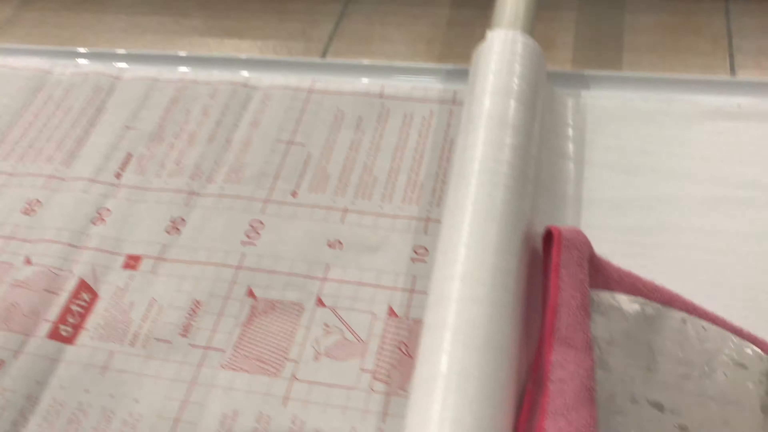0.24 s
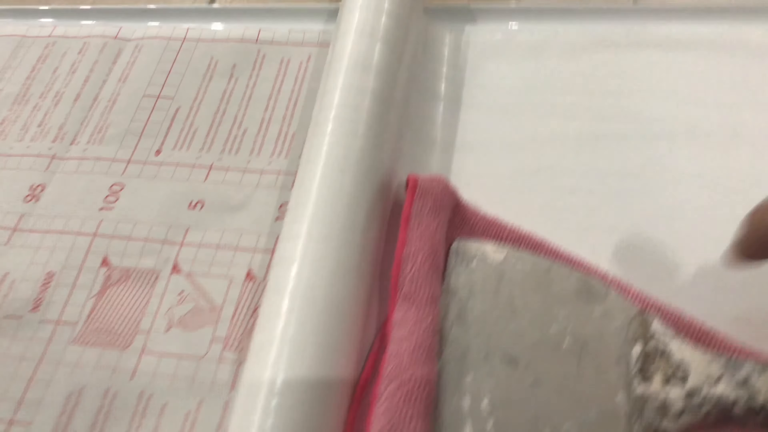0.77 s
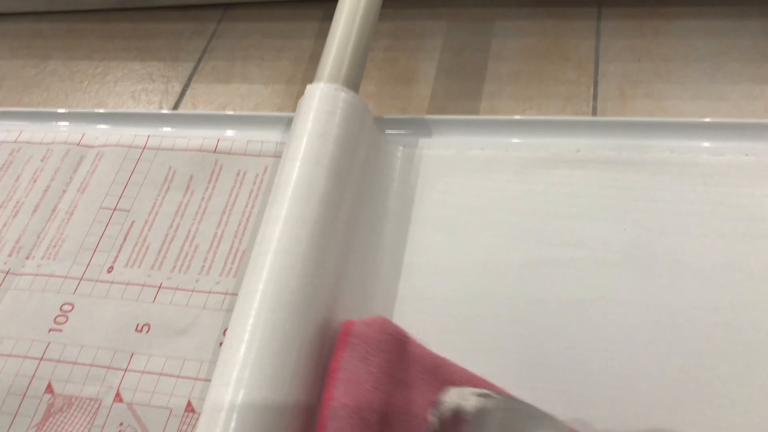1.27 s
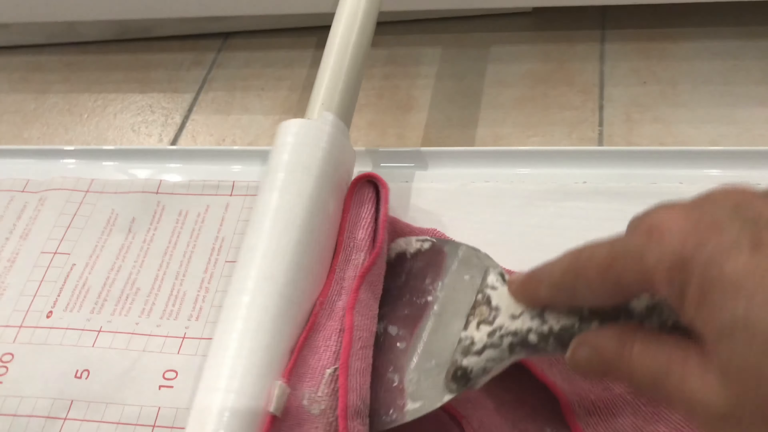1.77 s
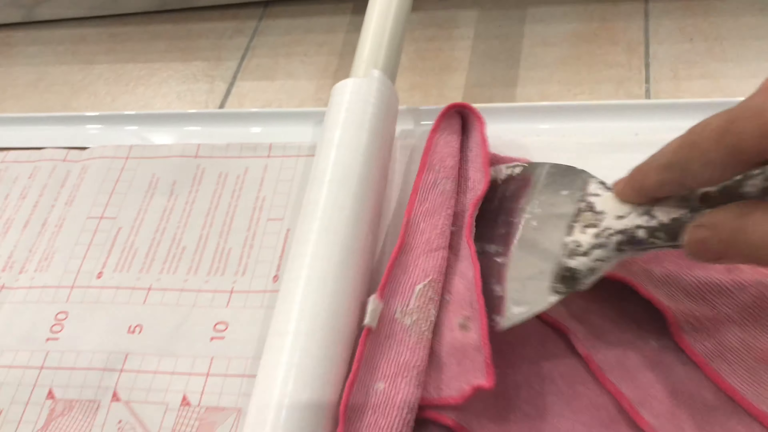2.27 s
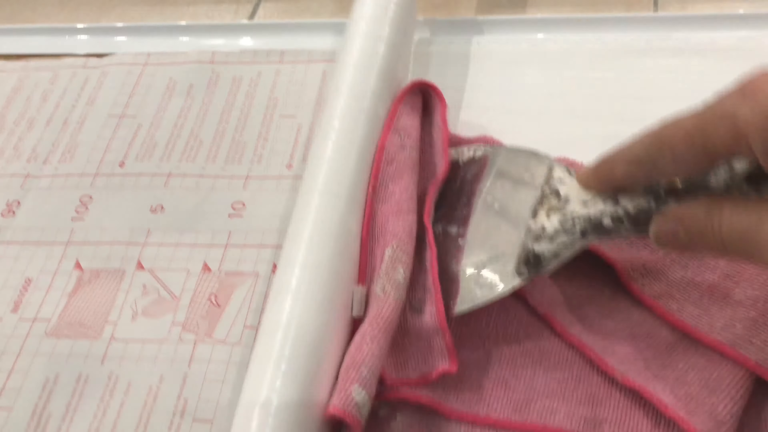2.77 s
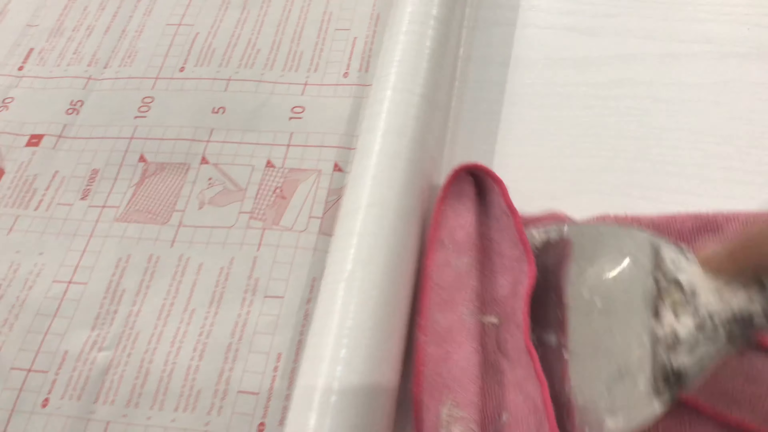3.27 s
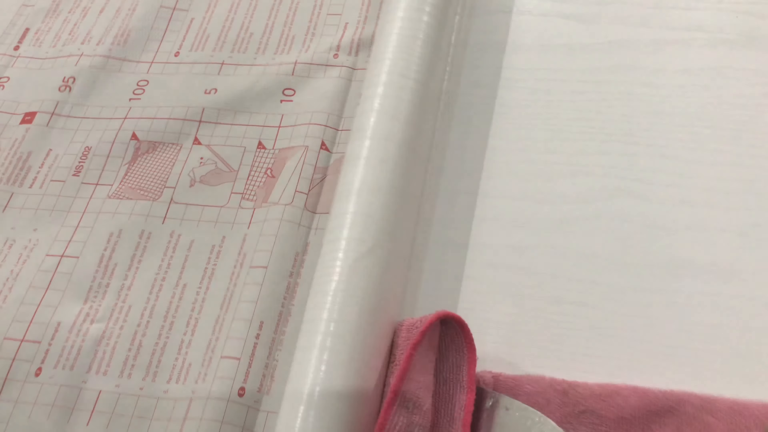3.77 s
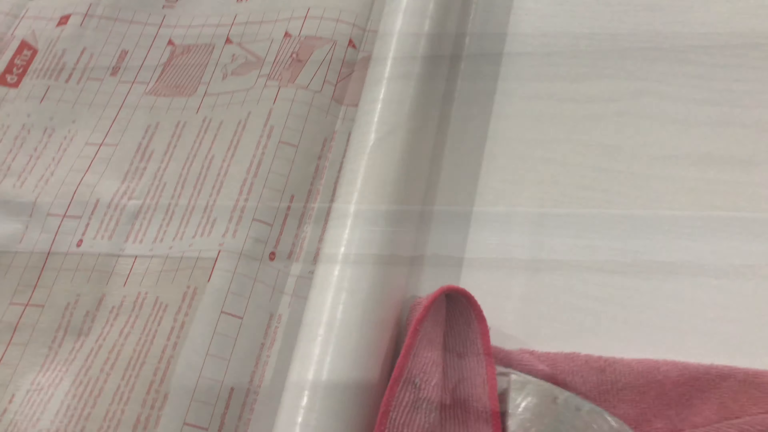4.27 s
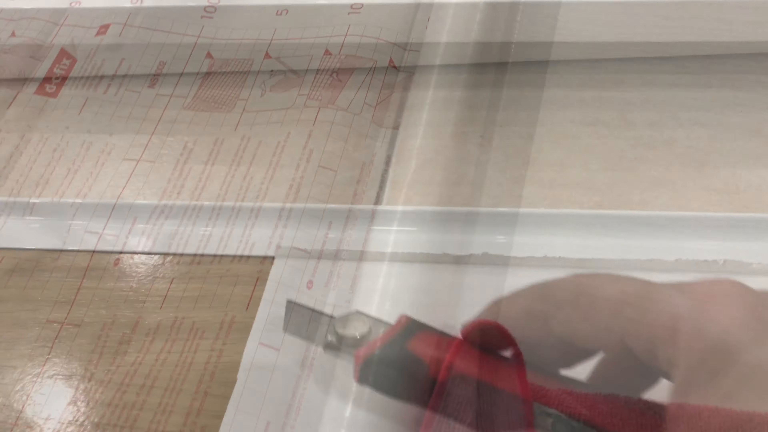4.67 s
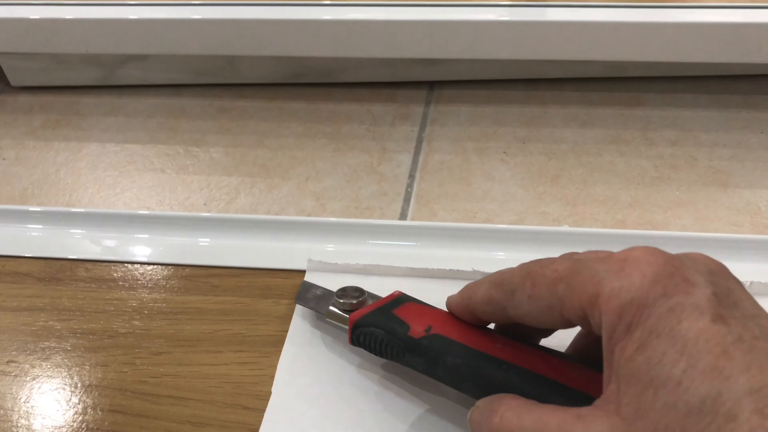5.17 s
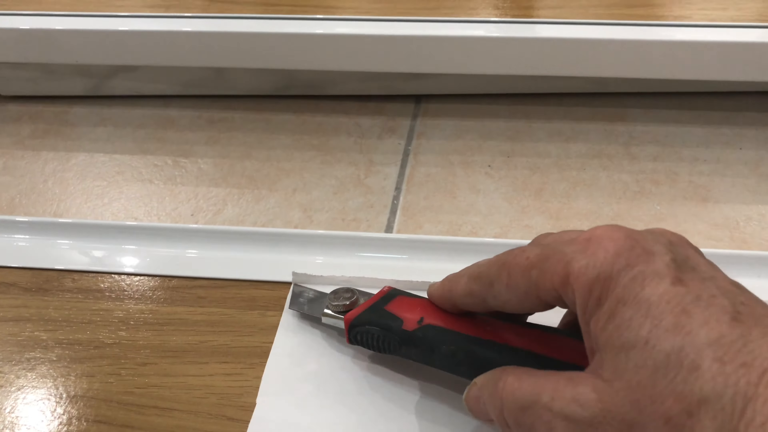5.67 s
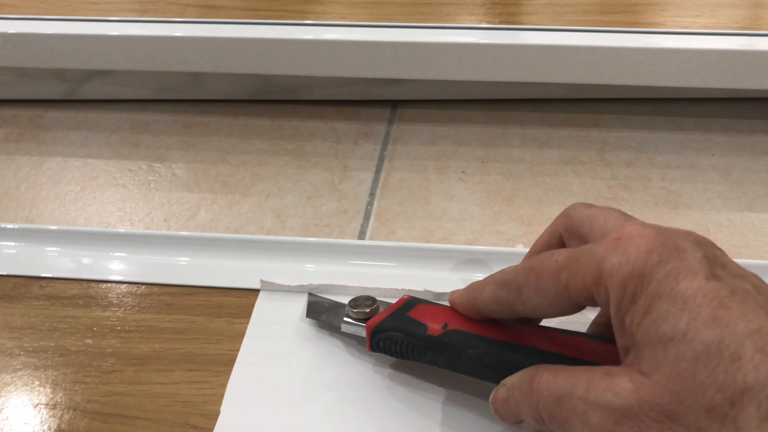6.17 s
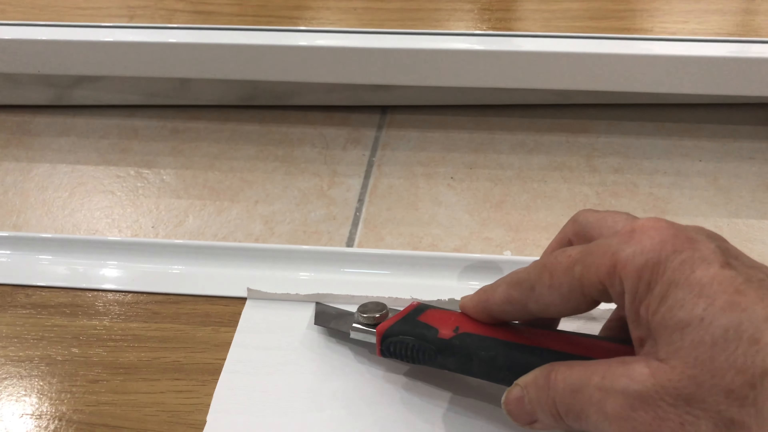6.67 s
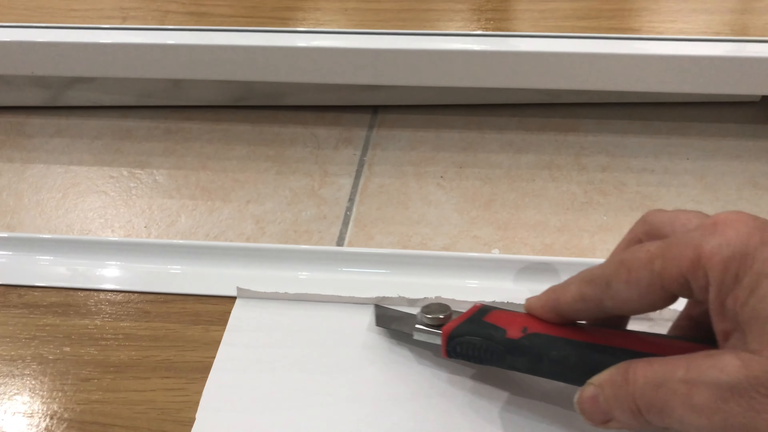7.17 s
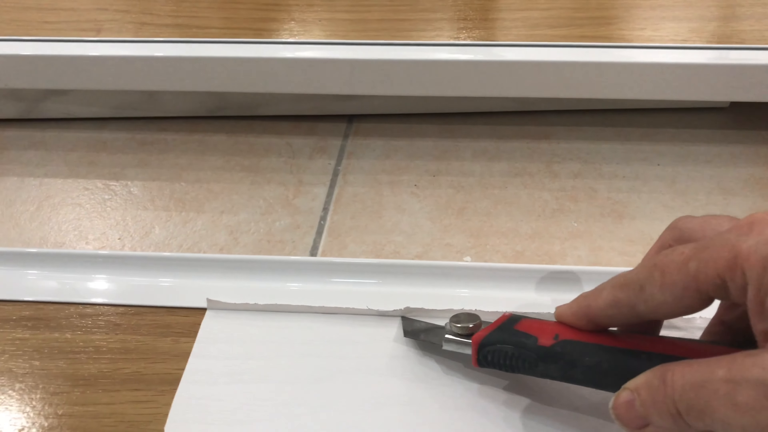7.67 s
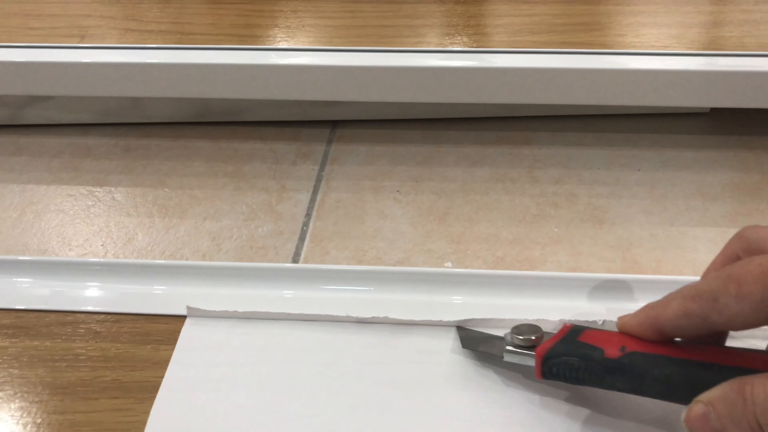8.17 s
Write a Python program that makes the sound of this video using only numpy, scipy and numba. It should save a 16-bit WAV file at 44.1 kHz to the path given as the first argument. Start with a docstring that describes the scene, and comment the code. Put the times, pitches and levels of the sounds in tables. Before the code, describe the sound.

Close, dry cloth swishes and regular snapping thuds as backing paper peels from sticky film, fading to near-quiet with tiny craft-knife clicks and scratches.

```python
"""A low room rumble and a faint rub of cloth, then the knock of a scraper on a board, close by in a small tiled room.
Self-adhesive film is pushed down in strokes: random micro-slips rub, hiss and swish, and the film squeaks.
Each hard shove excites the board's modes and peels backing paper with a burst of noisy crackle;
sharp snaps, mostly of the paper, are filtered impulses, and its creases tick as gliding bands.
Then a craft knife is drawn quietly along the film: tiny jerks through resonances, with small clicks."""
import sys
import numpy as np
from scipy import signal
from scipy.fft import rfft, irfft
from scipy.io import wavfile
from scipy.ndimage import uniform_filter1d
from numba import njit

SR = 44100
rng = np.random.default_rng(int(sys.argv[2]) if len(sys.argv) > 2 else 0)


def store_pcm(level_fs):
    """Save levels as 16-bit WAV."""
    pcm = np.round(np.clip(level_fs, -1, 1) * 32767).astype(np.int16)
    wavfile.write(sys.argv[1], SR, np.atleast_2d(pcm).T)


N = 371763
TIME = np.arange(N) / SR  # s

# strokes of the cloth, about three a second, each running on until the next begins:
# start_s, rub_db, hiss_db, swish_db
STROKES = [(-.2, -68, -70, -83), (.25, -73.5, -81.5, -71), (.39, -65.5, -59.5, -64.5),
           (0.521, -65.5, -72, -64), (.81, -58, -63, -63), (1.04, -63.5, -59.5, -57),
           (1.291, -52, -53, -48), (1.65, -53.5, -57.5, -80), (1.96, -58.5, -58.5, -80),
           (2.282, -55.5, -58, -49.5), (2.67, -53, -55.5, -51.5), (2.99, -52.5, -55, -50),
           (3.33, -53, -55.5, -51.5), (3.69, -52.5, -56.5, -54.5), (4.0, -56, -63.5, -93),
           (4.37, -65.5, -65.5, -64)]
LIFT_S = 4.53  # the cloth leaves the film

# hard shoves against the roll, each a knock on the board and a burst of peeling:
# knock_s, crackle_rms_db, crackle_decay_s, knock_db, contact_pitch_hz, board_ring_db, deep_thud_db
SHOVES = [(1.743, -26.5, 0.014, -27, 500, -31, -34.5), (2.021, -32, 0.025, -30, 445, -44, -37.5),
          (2.3603, -24.5, 0.0086, -16, 620, -32, -44), (2.7798, -28, 0.0098, -29, 470, -47, -52),
          (3.1048, -25.5, .011, -18, 471.7, -45, -39.5), (3.429, -31, 0.025, -27.5, 427, -57, -61),
          (3.7654, -27, 0.017, -29, 703, -50, -64)]


def undb(db):
    """Decibels to amplitude."""
    return 10 ** (np.asarray(db) / 20)


def unit(x):
    """Scale to rms 1."""
    return x / np.sqrt(np.mean(x ** 2))


def add(track, s, sound):
    """Mix a sound into a track at a time in seconds."""
    i = max(int(s * SR), 0)
    track[i:i + len(sound)] += sound[:max(N - i, 0)]


def through(x, response):
    """Filter a sound with an impulse response, keeping its length."""
    return signal.fftconvolve(x, response)[:len(x)]


def colour(points, tilt_db=0, size=2048):
    """Minimum-phase impulse response of unit energy for (Hz, dB) points, tilted per octave."""
    hz, db = np.transpose(points)
    octave = np.log2(np.maximum(np.fft.rfftfreq(size, 1 / SR), 10))
    # the tilt pivots at 1024 Hz and goes no further below 512 Hz
    level_db = np.interp(octave, np.log2(hz), db) + tilt_db * np.maximum(octave - 10, -1)
    cepstrum = irfft(np.log(undb(level_db)))
    # folding the cepstrum forward makes the response causal
    cepstrum[1:size // 2] *= 2
    cepstrum[size // 2 + 1:] = 0
    response = irfft(np.exp(rfft(cepstrum)))
    return response / np.linalg.norm(response)


def ring(modes, stretch=1):
    """Free ringing of (Hz, t60 s, dB) modes, each dying exponentially; peak 1."""
    t = TIME[:SR // 2]
    y = np.zeros(len(t))
    for hz, t60, db in modes:
        y += undb(db) * np.sin(2 * np.pi * hz * stretch * t) * np.exp(-np.log(1000) * t / t60)
    return y / np.abs(y).max()


@njit
def resonate(x, hz, width):
    """Band-pass whose centre may move every sample."""
    y, band, low = np.empty(len(x)), 0., 0.  # output and the two filter states
    for i in range(len(x)):
        g = np.tan(np.pi * hz[i] / SR)
        damping = width / hz[i]
        v = (band + g * (x[i] - low)) / (1 + g * (g + damping))
        band = 2 * v - band
        low = low + 2 * g * v
        y[i] = damping * v
    return y


def walk(rate):
    """Slow random wander of rms near 1, from smoothed random steps at a rate in Hz."""
    k = int(SR / rate)
    steps = np.repeat(rng.standard_normal(N // k + 1), k)
    return unit(uniform_filter1d(steps, k)[:N])


def slips(per_s, spread_db):
    """Tiny releases at random moments, most small and a few large; rms 1."""
    sizes = undb(spread_db * np.minimum(rng.exponential(size=N), 4))
    happens = rng.random(N) < per_s / SR
    return unit(happens * sizes * rng.standard_normal(N))


def swell(t, rise, decay):
    """Envelope that grows to 1 at t = 0 and dies away."""
    return np.exp(np.minimum(t / rise, -t / decay))


def air():
    """Low rumble of the house and a faint even hiss: steady coloured noise."""
    # relative spectrum of the air: hz, density_db
    air_colour = [(25, -5.5), (60, 0.5), (92, 0.5), (120, -6), (220, -6.5), (330, -11.5), (500, -14.5),
                  (900, -17), (1250, -18.5), (1440, -21), (1700, -21.5), (4500, -26), (10400, -30),
                  (13000, -25.5)]
    level_db = -66.5
    return undb(level_db) * unit(through(rng.standard_normal(N), colour(air_colour, size=8192)))


def turns():
    """The moments at which the cloth changes direction, ending with its lift."""
    return np.array([row[0] for row in STROKES] + [LIFT_S])


def sliding(turn_share=0.47, skew=.9, lift_fade_s=0.15, blend_s=.03):
    """Gains of rub and hiss: each stroke speeds up and slows again, never quite stopping at the turns."""
    edges = turns()
    progress = np.interp(TIME, edges, np.arange(len(edges)))
    stroke = np.minimum(progress.astype(int), len(STROKES) - 1)
    # a skew under 1 makes the stroke fastest early
    arch = np.abs(np.sin(np.pi * (progress - stroke) ** skew))
    lift = np.exp(-np.maximum(TIME - LIFT_S, 0) / lift_fade_s)
    speed = (turn_share + (1 - turn_share) * arch) * lift
    _, rub_db, hiss_db, _ = np.transpose(STROKES)
    return [speed * uniform_filter1d(undb(db)[stroke], int(blend_s * SR)) for db in (rub_db, hiss_db)]


def cloth(uneven_db=3.3, judder_db=-9, judder_hz=260, judder_spread_db=3):
    """Fibres catch and slip on the film: a rub that sounds through the board, a low judder, and a fine hiss."""
    # relative spectra of rub and hiss: hz, level_db
    rub_colour = [(60, 2.5), (150, -1.5), (240, 5), (380, -6), (700, -3.5), (1500, -2.5), (2500, -4.5),
                  (4000, -7), (6000, -24), (12000, -32.5)]
    hiss_colour = [(1500, -33.5), (4000, 2), (6000, 2.5), (8000, -0.5), (10400, -3), (13000, 0.5),
                   (16000, -3.5)]
    rub_gain, hiss_gain = sliding()
    grip = undb(uneven_db * walk(45))
    rub = through(slips(per_s=6300, spread_db=3.0) * grip, colour(rub_colour))
    catches = slips(per_s=720, spread_db=5) * undb(judder_spread_db * walk(17))
    judder = unit(resonate(catches, np.full(N, float(judder_hz)), judder_hz / 2))
    hiss = through(slips(per_s=18000, spread_db=3) * np.sqrt(grip), colour(hiss_colour))
    return rub_gain * (rub + undb(judder_db) * judder) + hiss_gain * hiss


def swishing(place=.73, half_s=.047, top_hz=1130, width_hz=650, bend=0.48):
    """Late in each stroke the cloth is drawn back; the weave sings higher the faster it slides."""
    out, weave, edges = np.zeros(N), slips(per_s=8000, spread_db=2), turns()
    crests = edges[:-1] + place * np.diff(edges)  # place is a share of the stroke
    for s, (*_, db) in zip(crests, STROKES):
        span = slice(max(int((s - .2) * SR), 0), int((s + .2) * SR))
        speed = np.exp(-((TIME[span] - s) / half_s) ** 2)
        centre = top_hz * (1 + bend * (speed - 1))  # rises and falls with the speed
        narrow = resonate(weave[span], centre, float(width_hz))
        band = resonate(narrow, centre, 2. * width_hz)
        add(out, TIME[span][0], undb(db) * speed * unit(band))
    return out


def peeling(lag_s=0.0039, rise_s=0.0044, shove_tilt_db=1.07):
    """Threads of glue let go in a dense crackle that swells with each shove and dies as the roll stops."""
    # backing paper pulling off the glue apart from the shoves:
    # crest_s, rms_db, rise_s, decay_s, tilt_db_per_octave
    peels = [(.34, -33.5, 0.00061, 0.0036, 1), (0.58, -32, 0.0044, 0.0076, -1.5),
             (.602, -34, 0.0035, 0.016, -2), (0.66, -48.5, .029, 0.038, 2.5),
             (.946, -38, 0.0026, .017, -3.5), (1.392, -32, 0.019, 0.042, 0), (1.404, -32.5, 0.018, 0.02, 9),
             (4.061, -38, 0.0054, 0.012, -.5), (4.083, -38.5, 0.018, 0.014, 1.5),
             (4.17, -45, 0.009, .017, 0.5), (4.8, -61.5, 0.027, 0.026, 2),
             (6.024, -64.5, 0.013, 0.013, 5.5)]
    # relative spectrum of the paper before tilting: hz, level_db
    paper_colour = [(60, 4), (250, -7.5), (500, 3.5), (900, 0.5), (1800, 1), (3300, -2.5), (4900, -6.5),
                    (6200, -7.5), (8000, -10.5), (10400, -14), (13000, -16), (16000, -22)]
    out, threads = np.zeros(N), slips(per_s=14000, spread_db=1.5)
    # a shove's crackle crests just after its knock
    shoved = [(s + lag_s, db, rise_s, decay, shove_tilt_db) for s, db, decay, *_ in SHOVES]
    for s, db, rise, decay, tilt_db in shoved + list(peels):
        span = slice(max(int((s - .15) * SR), 0), int((s + .35) * SR))
        pulled = threads[span] * swell(TIME[span] - s, rise, decay)
        add(out, TIME[span][0], undb(db) * through(pulled, colour(paper_colour, tilt_db)))
    return out


def blows(count=3, rebound_db=-8, rebound_ring_db=-16, rebound_pitch=0.79):
    """Every board contact as (s, dB, Hz, ring dB, thud dB): shoves stay pressed down, loose knocks rebound."""
    # tools dropped or set on the board, rebounding twice:
    # first_s, level_db, contact_pitch_hz, board_ring_db, deep_thud_db, rebound_gap_s
    knocks = [(0.342, -30, 510, -59, -37, 0.0082), (.56, -10.5, 506, -17, -56.5, 0.02),
              (0.8539, -23, 370, -36, -49, 0.03), (.9455, -23, 600, -37, -62, .008),
              (1.559, -34, 543, -31, -68.5, 0.036), (4.769, -43.5, 280, -45.5, -56, 0.012),
              (5.334, -42, 545, -45, -44.5, 0.021), (5.783, -49, 252, -50, -78, 0.032),
              (6.019, -52.5, 258, -59, -71, .015), (7.018, -56, 259.4, -72, -48, 0.037)]
    # the hand's weight lands just after each shove's knock, softer and always lower
    weight_lag_s, weight_db, weight_hz = 0.0014, -10, 205
    out = []
    for s, _, _, db, hz, ring_db, thud_db in SHOVES:
        out.append((s, db, hz, ring_db, -np.inf))
        out.append((s + weight_lag_s, db + weight_db, weight_hz, -np.inf, thud_db))
    for s, db, hz, ring_db, thud_db, gap in knocks:
        for k in range(count):  # each rebound is weaker, stirs the board less and is softer
            ring_loss = k * rebound_ring_db
            out.append((s + k * gap, db + k * rebound_db, hz * rebound_pitch ** k,
                        ring_db + ring_loss, thud_db + ring_loss))
    return out


def knocking(cycles=0.29, grit=0.12, scuff_s=0.0079, detune=0.014, spread_s=0.0057):
    """A padded blow is a brief damped swing with a scuff; the board rings on and rocks on its support."""
    # modes of the board: hz, t60_s, relative_db
    board_modes = [(190, 0.26, -0.5), (226, 0.31, 3.5), (252.5, 0.21, -1.5), (307, .14, -8.5),
                   (382, 0.25, -3), (396.3, 0.19, -3), (460, .16, 0.5), (632, 0.22, -2), (750, .25, -13.5),
                   (927, 0.21, -7), (1030, .2, -3), (1130, 0.17, -5.5), (1450, 0.034, 3.5), (2260, .08, -6)]
    # the whole board rocking on its support: hz, t60_s, relative_db
    support_modes = [(59, 0.47, -1), (76, .09, -1), (88, 0.42, 1), (120, 0.037, -5.5), (150, 0.25, -3)]
    out, t = np.zeros(N), TIME[:SR // 2]
    thud = ring(support_modes)
    crunch = colour([(300, -9.5), (1200, 3.0), (2300, -8.0), (3500, -15.0), (12000, -23)])
    spread = 1 - np.exp(-t / spread_s)  # bending waves take a moment to fill the board
    for s, db, hz, ring_db, thud_db in blows():
        age = t * hz / cycles
        blow = -age * np.exp(1 - age) * np.sin(2 * np.pi * hz * t)
        scuff = grit * np.exp(-t / scuff_s) * through(rng.standard_normal(len(t)), crunch)
        # each blow finds the board's modes at a slightly different random tuning
        tuning = 1 + detune * rng.standard_normal()
        # a soft contact barely stirs modes well above its own pitch
        stirred = [(f, t60, level - 10 * np.log10(1 + (f / hz / 2) ** 4)) for f, t60, level in board_modes]
        board = ring(stirred, tuning)
        ringing = spread * (undb(ring_db) * board + undb(thud_db) * thud)
        add(out, s, undb(db) * (blow + scuff) + ringing)
    return out


def snapping(flutter=0.068, flutter_s=0.0028):
    """Each snap is one sharp impulse with a few milliseconds of noisy flutter, filtered to its colour."""
    # sharp snaps, mostly of stiff paper; the last, at 5.333 s, is a knife click:
    # start_s, level_db, tilt_db_per_octave
    snaps = [(0.344, -27.5, 7), (0.563, -26, 3.5), (0.58, -18.5, 4), (1.378, -12, -2), (1.7523, -13.5, -1),
             (2.0268, -15.5, 0.5), (2.032, -17.5, -2), (2.3655, -13.5, 3), (2.3702, -16.5, 0.5),
             (2.7815, -16.5, 0), (2.7856, -18.5, 2), (3.1047, 0.5, 2), (3.4274, -13.5, -2.5),
             (3.439, -14, 2), (3.468, -15.5, 11.5), (3.767, -13, 2.5), (3.7747, -5.5, 4.5),
             (3.786, -8, 13.5), (4.1464, -13.5, 5.5), (5.333, -38, 17)]
    # relative spectrum of a snap before tilting: hz, level_db
    snap_colour = [(100, -17), (500, -1.5), (1800, 0), (3300, 8), (4800, 0.5), (6200, 2.5), (8000, -6.5),
                   (11000, -15), (16000, -17.5)]
    out, t = np.zeros(N), TIME[:2048]
    for s, db, tilt_db in snaps:
        crack = colour(snap_colour, tilt_db)
        kick = (t == 0) + flutter * rng.standard_normal(len(t)) * np.exp(-t / flutter_s)
        add(out, s, -undb(db) * through(kick, crack / np.abs(crack).max()))
    return out


def squeaking(wobble=0.0048):
    """Film that sticks and slips fast under the scraper gives a short, nearly pure note."""
    # squeaks: crest_s, peak_db, mean_pitch_hz, half_length_s
    squeaks = [(0.347, -40, 1130, 0.0047), (0.369, -37.5, 922, 0.023), (0.507, -48.5, 1160, 0.011)]
    wavering_time = np.cumsum(1 + wobble * walk(78.6)) / SR
    out = np.zeros(N)
    for s, db, hz, half_s in squeaks:
        bell = np.exp(-((TIME - s) / half_s) ** 2)
        out += undb(db) * bell * np.sin(2 * np.pi * hz * wavering_time)
    return out


def ticking(give_s=0.0016, width_hz=2400, lead=0.56, top_hz=8000):
    """A crease gives way in a brief stutter; short bending waves run fastest, so the treble arrives first."""
    # creases in the loose paper: start_s, peak_db, settling_pitch_hz
    ticks = [(1.303, -35.5, 3480), (3.9655, -26.5, 2255), (3.996, -32, 2500), (4.032, -36.5, 2200),
             (4.1463, -20.5, 2550), (4.187, -30, 3100), (4.298, -32, 1910), (4.3254, -33.5, 2300),
             (4.355, -46, 2580)]
    out, t = np.zeros(N), TIME[:SR // 20]
    damping = signal.butter(2, top_hz, fs=SR, output="sos")
    for s, db, hz in ticks:
        burst = rng.standard_normal(len(t)) * np.sqrt(t) * np.exp(-t / give_s)
        stutter = signal.sosfilt(damping, burst)
        falling_hz = hz * (1 + lead * np.exp(-2 * t / give_s))
        tick = resonate(stutter, falling_hz, float(width_hz))
        add(out, s, undb(db) * tick / np.abs(tick).max())
    return out


def knife(uneven_db=1.5, touch_s=0.00011):
    """The edge parts the film in tiny jerks that ring the blade and the board; now and then it clicks."""
    # pulls along the edge: crest_s, level_db, rise_s, decay_s
    pulls = [(4.961, -71.5, .1, .15), (5.9, -70, 0.28, 0.18), (7.07, -57.5, .12, 0.15),
             (7.69, -65, 0.025, 0.067), (8.0, -69, 0.16, 0.28)]
    # blade and board under the cut: hz, width_hz, relative_db
    cut_modes = [(229.6, 101, 12), (348, 185, 8), (560, 180, 2.5), (1438, 96, 3.5), (2240, 260, -7),
                 (2714, 66, 0), (2990, 110, -3), (4140, 360, -6.5), (9200, 1500, -16)]
    # the knife clicking on the edge: start_s, peak_db
    clacks = [(4.955, -53), (5.055, -53), (5.3327, -40), (5.347, -49), (5.569, -60), (5.681, -55),
              (5.782, -65), (5.873, -59), (7.68, -60), (7.82, -56.5), (7.96, -60), (8.035, -54.5)]
    # modes of the knife: hz, t60_s, relative_db
    clack_modes = [(577, 0.041, 2), (1372, 0.05, -4), (1452, 0.026, 0), (2140, 0.032, -2.5),
                   (2400, 0.02, -8), (2660, 0.038, -16), (3200, 0.041, -18), (6000, 0.025, -11.5)]
    pull = sum(undb(db) * swell(TIME - s, rise, decay) for s, db, rise, decay in pulls)
    jerks = slips(per_s=5800, spread_db=2.5) * undb(uneven_db * walk(30))
    body = np.zeros(N)
    for k, (hz, width, db) in enumerate(cut_modes):
        sign = (-1) ** k  # neighbouring modes move in opposite senses
        body += sign * undb(db) * resonate(jerks, np.full(N, float(hz)), float(width))
    out, t = pull * unit(body), TIME[:SR // 10]
    for s, db in clacks:
        touch = rng.standard_normal(len(t)) * np.exp(-t / touch_s)
        clack = through(touch, ring(clack_modes))
        add(out, s, undb(db) * clack / np.abs(clack).max())
    return out


def reflections(low_t60=0.31, high_t60=0.29, wet_db=-8, near_db=-9, near_s=0.0025):
    """Quick reflections off board and floor, then the short tail of a tiled room, as decaying noise."""
    t = TIME[:SR // 2]
    near, far = rng.standard_normal((2, len(t)))
    low = signal.sosfilt(signal.butter(2, 2500, fs=SR, output="sos"), far)
    low_tail = low * np.exp(-np.log(1000) * t / low_t60)
    high_tail = 0.82 * (far - low) * np.exp(-np.log(1000) * t / high_t60)
    tail = (low_tail + high_tail) * (t > .008)
    early = near * np.exp(-t / near_s) * (t > .0015)
    # dividing by the root of the length gives each part unit energy before its level
    return (undb(wet_db) * unit(tail) + undb(near_db) * unit(early)) / np.sqrt(len(t))


def room(x):
    """Hands and microphone keep moving, so a new pattern of reflections fades in every quarter second."""
    out, hop = x.copy(), SR // 4
    for i in range(0, N, hop):
        piece = x[i:i + 2 * hop]
        faded = piece * np.hanning(2 * hop)[:len(piece)]
        add(out, i / SR, signal.fftconvolve(faded, reflections()))
    return out


def scene():
    """Film work and knife in the tiled room, over the air."""
    work = peeling() + snapping() + ticking() + knocking() + squeaking() + swishing() + cloth() + knife()
    return (room(work) + air())[None]


def record(dry):
    """The microphone drops the deepest rumble; the recorder clips at full scale and cuts the top."""
    top_hz = 15950
    heard = signal.sosfilt(signal.butter(2, 36, "high", fs=SR, output="sos"), dry)
    clipped = np.clip(heard, -1, 1)
    return signal.sosfilt(signal.ellip(10, .1, 70, top_hz, fs=SR, output="sos"), clipped)


dry = scene()
out = record(dry)
store_pcm(out)
```